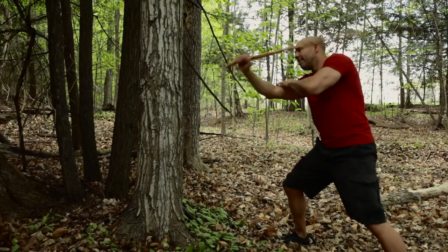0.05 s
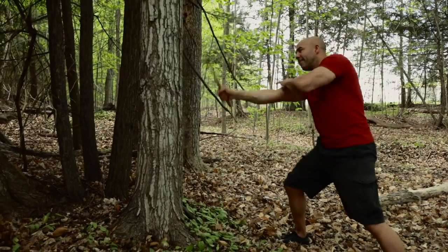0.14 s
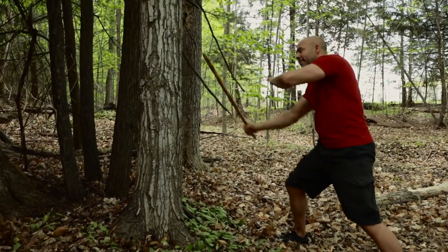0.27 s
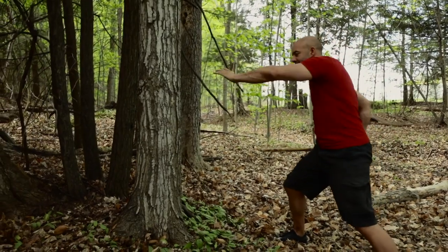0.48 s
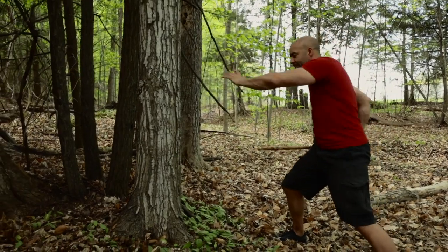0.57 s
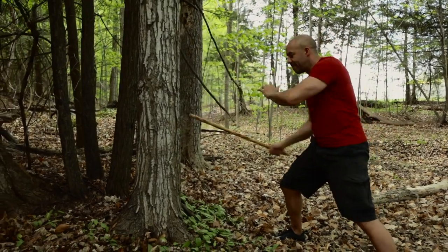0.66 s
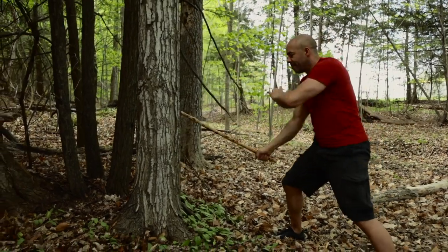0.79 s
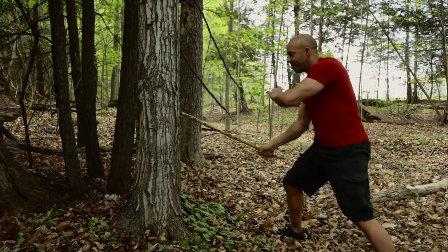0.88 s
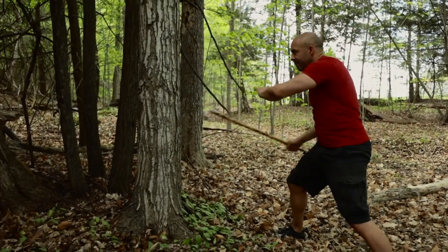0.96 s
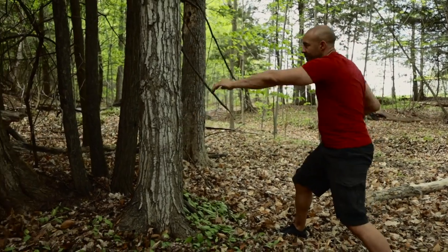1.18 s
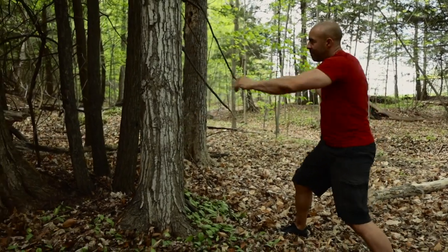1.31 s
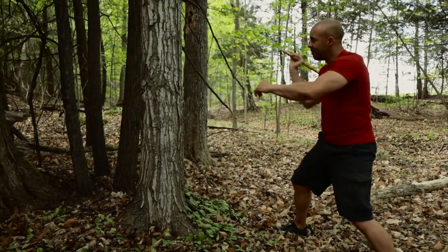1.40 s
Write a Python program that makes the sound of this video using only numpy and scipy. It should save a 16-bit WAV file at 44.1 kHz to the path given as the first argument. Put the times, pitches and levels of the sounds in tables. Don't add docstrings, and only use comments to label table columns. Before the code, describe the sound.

A wooden stick hits a tree trunk with one hard, dry crack, then two much lighter quick knocks and a soft footfall, over faint cloth and leaf rustle in an open forest, mono microphone at some distance.

```python
import sys
import numpy as np
from scipy import signal
from scipy.fft import rfft, irfft
from scipy.io import wavfile

SR = 44100
rng = np.random.default_rng(int(sys.argv[2]) if len(sys.argv) > 2 else 0)


def how_loud(loudness_db):
    steps = np.asarray(loudness_db, float) / 20
    return 10 ** steps


def inscribe(sig):
    pcm = np.round(np.clip(np.atleast_2d(sig).T, -1, 1) * 32767)
    wavfile.write(sys.argv[1], SR, pcm.astype(np.int16))


N = 63945

# time in seconds, level in dB.
RUSTLE_LEVEL = [(0, -72), (.05, -78.5), (.08, -74.5), (.12, -83), (.2, -79), (.4, -74), (.46, -79),
                (.53, -72), (.57, -78), (.62, -87.5), (.72, -83.5), (.8, -82), (.95, -87.5), (1.1, -78.5),
                (1.22, -86.5), (1.33, -82), (1.45, -83.5)]
# frequency in Hz, density in dB per Hz.
RUSTLE_SPECTRUM = [(880, -34), (1500, -12.5), (1690, -11.5), (2140, -3), (3000, -8.5), (4830, -7),
                   (6630, -10), (13900, -10), (16000, -23)]
# frequency in Hz, density in dB per Hz.
TRAFFIC_SPECTRUM = [(120, -30), (200, -3.5), (325, -9), (387, -7.5), (993, -2.5), (1180, -7.5), (1510, -10),
                    (1800, -14.5), (5000, -35), (6500, -60), (11000, -120)]
# time in seconds, level in dB.
TRAFFIC_SWELL = [(0.0, -69), (0.544, -68.5), (0.936, -66.5), (1.17, -68.5), (1.45, -68)]
# time in seconds, level in dB.
GUSTS = [(0, -68.5), (.1, -66), (.35, -62), (.5, -61), (.58, -68.5), (.7, -64.5), (.8, -63), (1.0, -61.5),
         (1.25, -63.5), (1.45, -62.5)]
# frequency in Hz, density in dB per Hz.
WIND_SPECTRUM = [(12, -38), (20, -8), (70, -0.5), (113, 0.5), (151, -9.5), (250, -17.5), (320, -43),
                 (550, -120)]
# start in seconds, level in dB, pitch in Hz, 60 dB decay in seconds, signed direction (a factor).
THUMPS = [(.065, -56.5, 67, 0.24, 1), (0.2205, -37, 270, .01, -1), (.2205, -33.5, 41.6, 0.11, 0.7),
          (.2225, -26.5, 234, 0.0081, 0.99), (0.2225, -34.5, 102, 0.052, 0.92),
          (.2255, -34.5, 580, 0.014, 0.91), (.241, -46, 627, 0.033, 1), (0.2428, -41.5, 68.7, 0.24, 1),
          (.243, -51, 380, 0.054, 0.86), (0.401, -50.5, 42.7, .25, 1), (0.4, -48.5, 82, .2, 0.98),
          (.48, -54.5, 60.7, .2, 0.85), (0.511, -50.5, 75, .2, 0.88), (.823, -49.5, 35, 0.19, 1),
          (0.8232, -37.5, 266, 0.028, -1.09), (0.8252, -49, 386, 0.023, 0.81),
          (0.8758, -36, 598, 0.014, -0.88), (.877, -45.5, 35.4, 0.13, 0.96), (.935, -53, 99, .15, 1),
          (1.03, -54, 69, 0.19, 1), (1.051, -59, 294, 0.032, 1), (1.154, -43, 88, 0.061, -1.06),
          (1.158, -40, 48.3, 0.12, 0.95), (1.432, -50, 55, 0.22, 1)]
# start in seconds, level in dB, rise in seconds, 60 dB decay in seconds.
TICKS = [(.203, -76, .002, .02), (.234, -55, .004, .1), (.525, -69, .005, .04), (.617, -81, .001, .015),
         (.794, -77, .001, .01), (.827, -64, .003, .2), (1.07, -79, .001, .015), (1.128, -79, .001, .015),
         (1.3155, -73, .001, .01), (1.3725, -69, .001, .025), (1.4195, -63, .0006, .01),
         (1.425, -72, .001, .01)]
# start in seconds, level in dB, rise in seconds, 60 dB decay in seconds.
CRUSHES = [
    (.2206, -30, 0.0019, 0.023),
    (.2272, -37, 0.0017, 0.026),
    (.8236, -48, 0.0024, 0.013),
    (.8748, -52, 0.00068, 0.041),
]
# frequency in Hz, density in dB per Hz.
BARK_SPECTRUM = [(470, -49.5), (800, -7.5), (2210, -9), (2910, -16.5), (3260, -9.5), (4990, -11),
                 (9570, -15), (10400, -12), (16000, -22)]
# start in seconds, level in dB, pitch in Hz, 60 dB decay in seconds.
WOOD_MODES = [(.2209, -31.5, 2230, 0.013), (.2218, -32, 3830, 0.014), (.2226, -26.5, 4850, 0.011),
              (.2236, -29.5, 1710, 0.0064), (0.2235, -33.5, 6670, 0.0095), (0.2238, -37, 1146, 0.015),
              (.224, -41.5, 704, 0.046), (.227, -26.5, 2120, 0.0099), (.2285, -37, 1367, 0.028),
              (.794, -68, 6400, 0.01), (.8236, -58, 1160, .008), (.8237, -40, 4280, 0.0072),
              (0.8236, -44, 5420, 0.011), (.8242, -45, 14000, .01), (0.8249, -47.5, 1770, 0.0096),
              (0.8239, -49, 6800, .008), (0.8245, -41, 8710, 0.0062), (.8264, -47.5, 2980, 0.01),
              (.875, -48.5, 5800, 0.0053), (.8752, -52, 3700, 0.008), (.8757, -45, 1260, 0.0059),
              (.8797, -51.5, 890, 0.0087), (1.373, -67, 7750, 0.012), (1.4197, -55.5, 4600, 0.0046),
              (1.4197, -60, 6300, .004), (1.4198, -49, 1400, 0.0029), (1.4199, -53.5, 2370, .004),
              (1.7, -66, 4600, 0.0071)]
# frequency in Hz, density in dB per Hz.
ECHO_SPECTRUM = [(180, -36), (300, 0), (614, -8), (667, -8), (801, -13.5), (1030, -19), (1230, -8.5),
                 (10700, -16), (16000, -20)]


def rms_one(x):
    return x / np.sqrt(np.mean(x ** 2) + 1e-20)


def in_time(rows):
    return np.interp(np.arange(N) / SR, *np.transpose(rows))


def drift(rate_hz):
    hop = 40
    settle = 2000
    pole = np.exp(-2 * np.pi * rate_hz * hop / SR)
    noise = rng.standard_normal(N // hop + settle + 2)
    slow = rms_one(signal.lfilter([1], [1, -2 * pole, pole * pole], noise)[settle:])
    return np.interp(np.arange(N) / hop, np.arange(len(slow)), slow)


def coloured(spectrum, patchy_db):
    hz = np.fft.rfftfreq(N, 1 / SR) + 1
    at, db = np.transpose(spectrum)
    density_db = np.interp(np.log(hz), np.log(at), db, left=-90, right=-90)
    lines = rfft(rng.standard_normal(N)) * how_loud(density_db)
    half_octave = (2 * np.log2(hz / 20)).astype(int)
    total = np.zeros(N)
    for k in range(20):
        band = irfft(lines * (half_octave == k), N)
        total += band * how_loud(patchy_db * drift(14.0))
    return rms_one(total)


def shaped(x, spectrum):
    hz = np.fft.rfftfreq(512, 1 / SR) + 1
    at, db = np.transpose(spectrum)
    cepstrum = irfft(np.log(how_loud(np.interp(np.log(hz), np.log(at), db))))
    cepstrum[1:256] *= 2
    cepstrum[257:] = 0
    response = irfft(np.exp(rfft(cepstrum)))
    return signal.lfilter(rms_one(response) / np.sqrt(512), [1], x)


def burst(start_s, rise_s, t60_s):
    t = np.maximum(np.arange(N) / SR - start_s, 0)
    rise = np.sin(np.pi / 2 * np.minimum(t / rise_s, 1)) ** 2
    return rise * how_loud(-60 * np.maximum(t - rise_s, 0) / t60_s)


def ringing(start_s, db, hz, t60_s, turns):
    phase = 2 * np.pi * hz * (np.arange(N) / SR - start_s)
    return how_loud(db) * burst(start_s, turns / hz, t60_s) * np.sin(phase)


def rustle():
    return how_loud(in_time(RUSTLE_LEVEL)) * coloured(RUSTLE_SPECTRUM, patchy_db=1.0)


def far_traffic():
    swell_db = in_time(TRAFFIC_SWELL)
    mean_level_db = -67
    return how_loud(mean_level_db + swell_db - swell_db.mean()) * coloured(TRAFFIC_SPECTRUM, patchy_db=1.5)


def wind():
    return how_loud(in_time(GUSTS)) * coloured(WIND_SPECTRUM, patchy_db=2.5)


def thumps():
    total = np.zeros(N)
    for start_s, db, hz, t60_s, direction in THUMPS:
        total += direction * ringing(start_s, db, hz, t60_s, turns=0.29)
    return total


def bark():
    snaps_per_s, spread_db = 30000, 2.0
    size = how_loud(spread_db * rng.exponential(1, N))
    sign = rng.choice([-1, 1], N)
    happens = rng.random(N) < snaps_per_s / SR
    snaps = rms_one(size * sign * happens)
    envelope = np.zeros(N)
    for start_s, db, rise_s, t60_s in [*CRUSHES, *TICKS]:
        envelope += how_loud(db) * burst(start_s, rise_s, t60_s)
    return shaped(snaps * envelope, BARK_SPECTRUM)


def wood_modes():
    return sum(ringing(*row, turns=1.3) for row in WOOD_MODES)


def trees():
    level_db, delay_s, rise_s, t60_s = -59.5, .006, .01, 0.49
    strongest_db = CRUSHES[0][1]
    envelope = np.zeros(N)
    for start_s, db, _, _ in CRUSHES:
        envelope += how_loud(db - strongest_db) * burst(start_s + delay_s, rise_s, t60_s)
    return how_loud(level_db) * envelope * coloured(ECHO_SPECTRUM, patchy_db=1.5)


def scene():
    background = rustle() + far_traffic() + wind()
    blows = thumps() + bark() + wood_modes() + trees()
    return (background + blows)[None]


def roll_off(x):
    return signal.sosfilt(signal.butter(12, 16500, fs=SR, output="sos"), x)


def record(dry):
    low_pass = signal.cheby2(12, 60, 16600, fs=SR, output="sos")
    mix = signal.sosfilt(low_pass, dry)
    return roll_off(mix)


dry = scene()
out = record(dry)
inscribe(out)
```